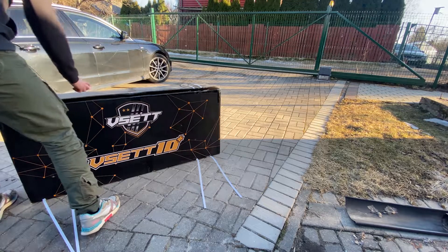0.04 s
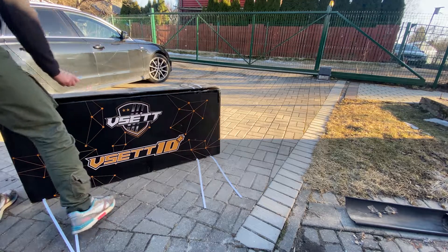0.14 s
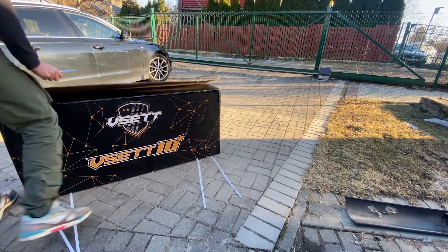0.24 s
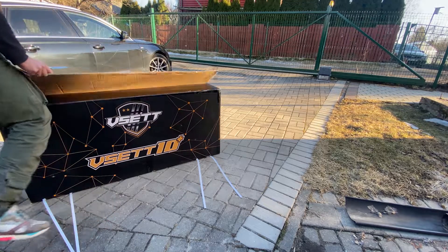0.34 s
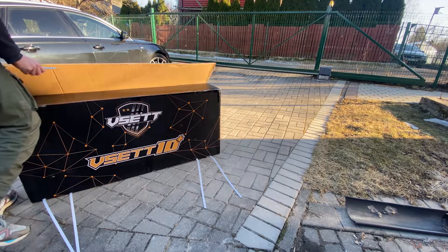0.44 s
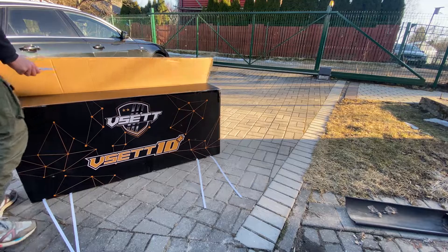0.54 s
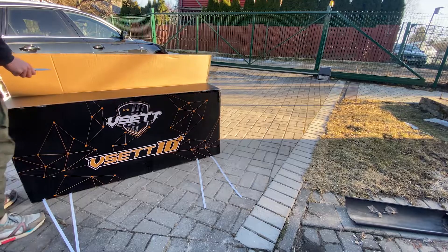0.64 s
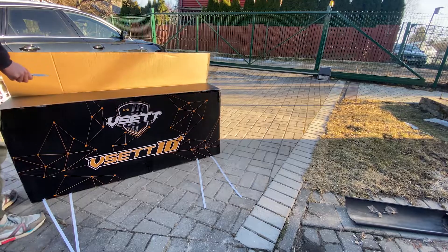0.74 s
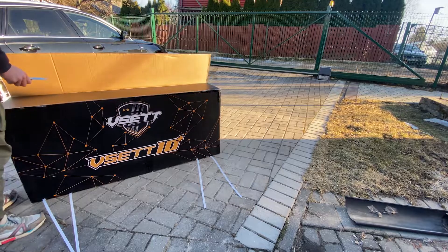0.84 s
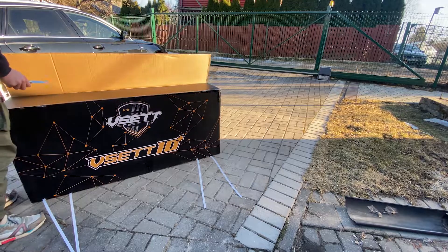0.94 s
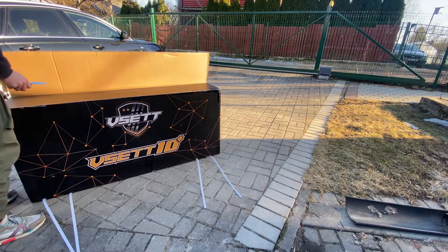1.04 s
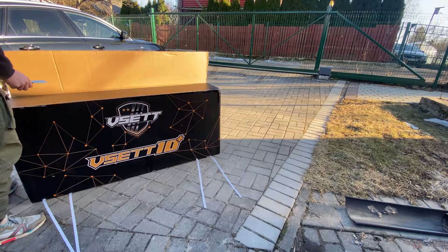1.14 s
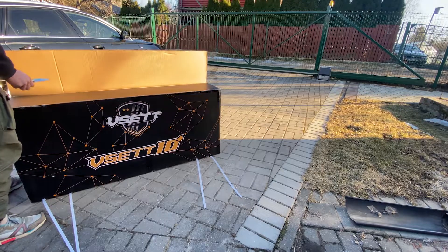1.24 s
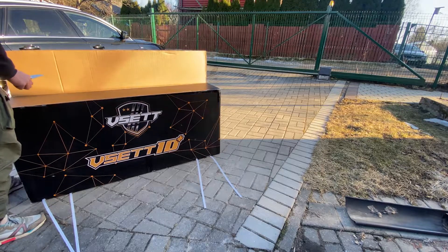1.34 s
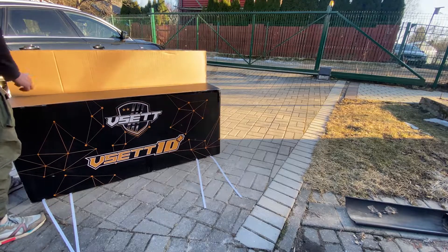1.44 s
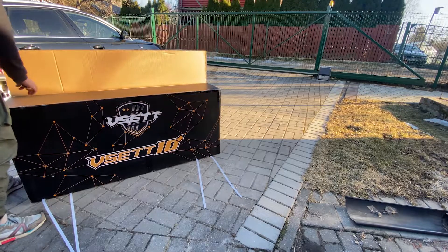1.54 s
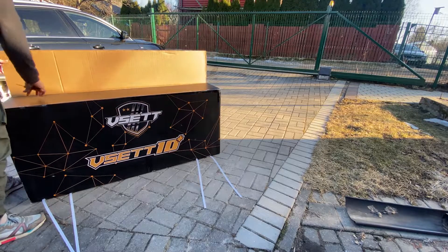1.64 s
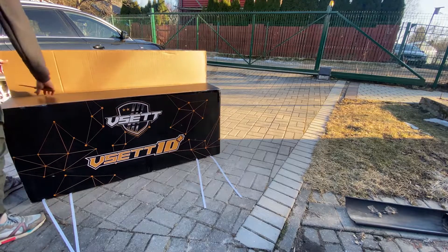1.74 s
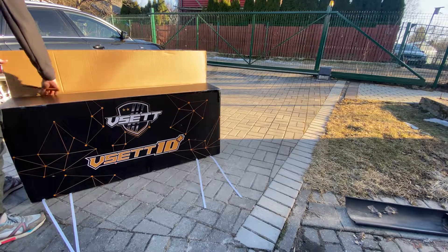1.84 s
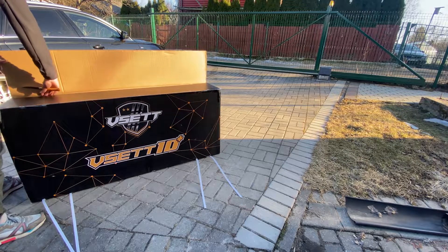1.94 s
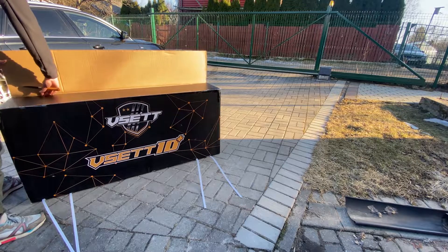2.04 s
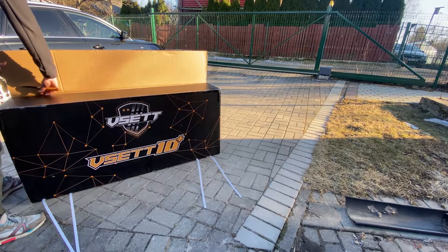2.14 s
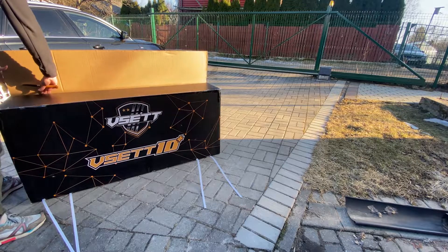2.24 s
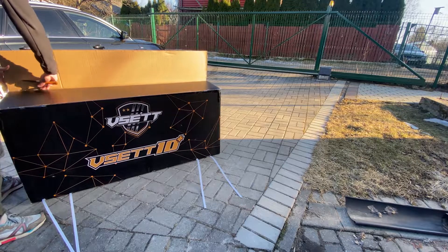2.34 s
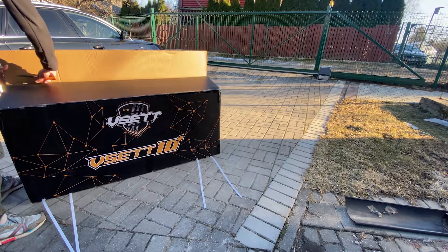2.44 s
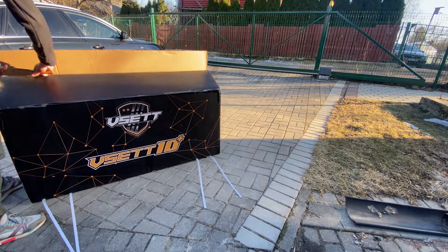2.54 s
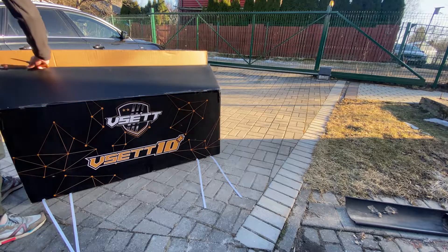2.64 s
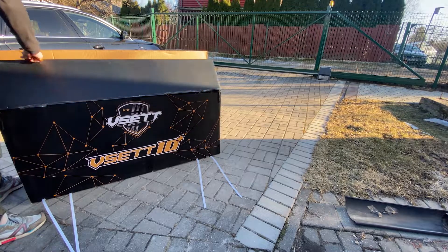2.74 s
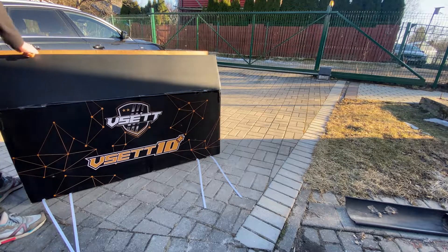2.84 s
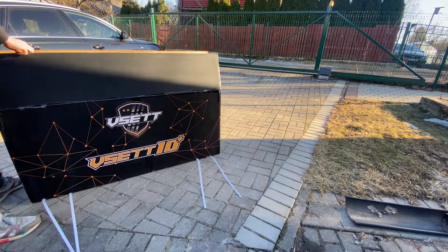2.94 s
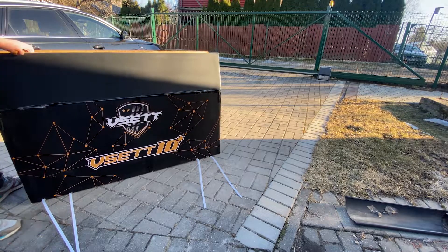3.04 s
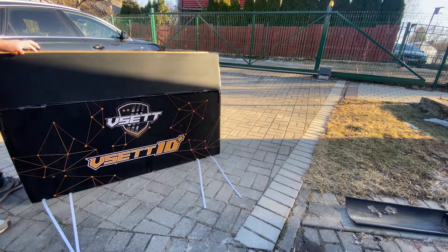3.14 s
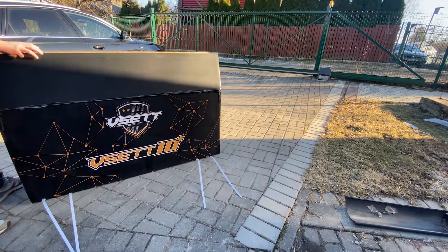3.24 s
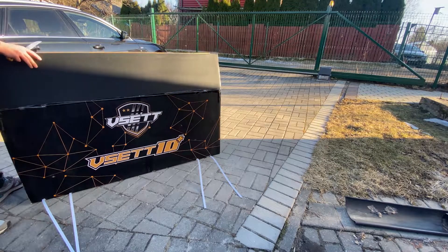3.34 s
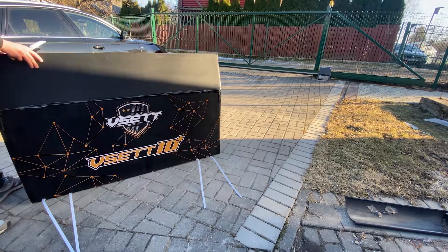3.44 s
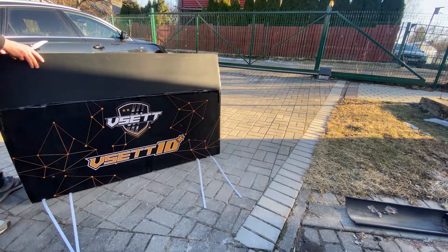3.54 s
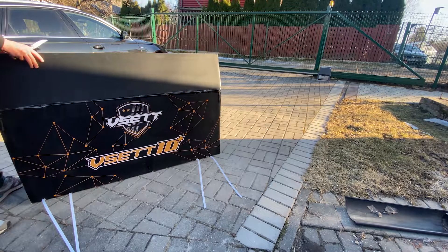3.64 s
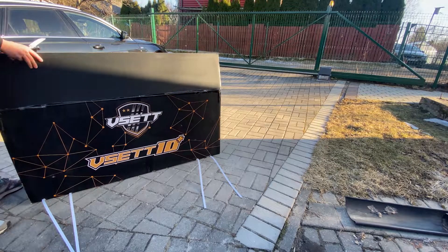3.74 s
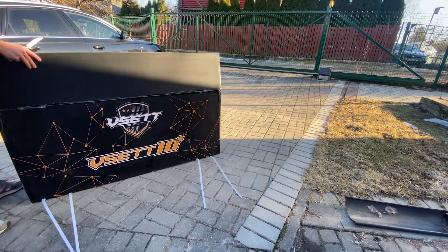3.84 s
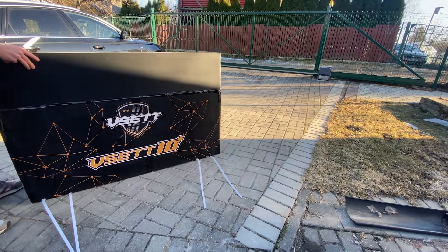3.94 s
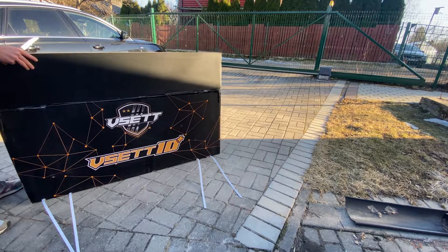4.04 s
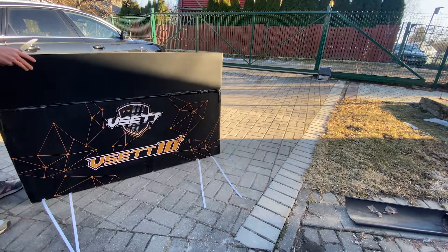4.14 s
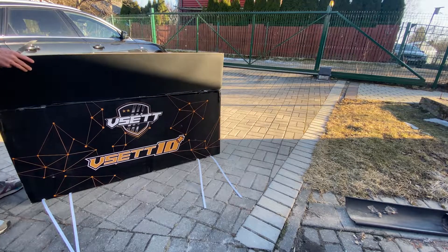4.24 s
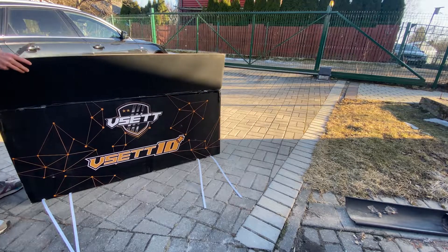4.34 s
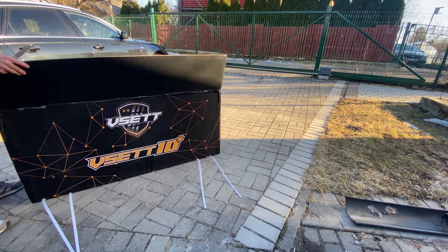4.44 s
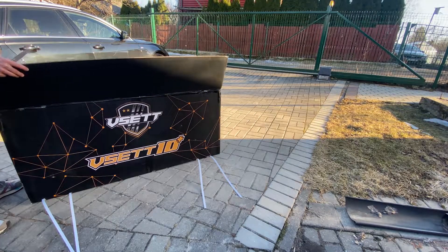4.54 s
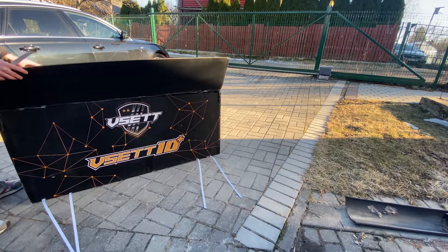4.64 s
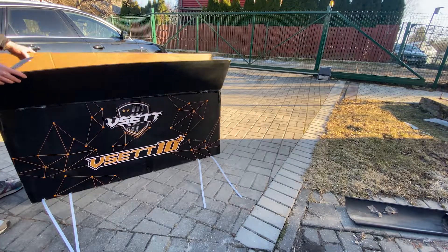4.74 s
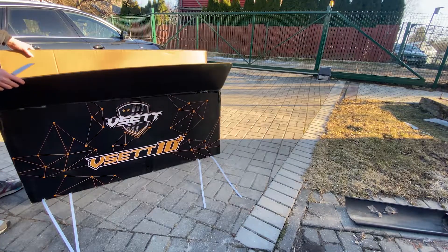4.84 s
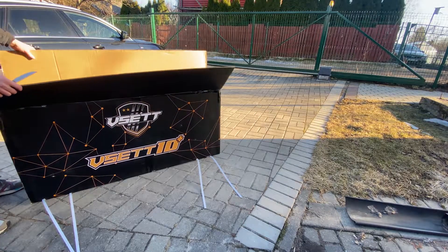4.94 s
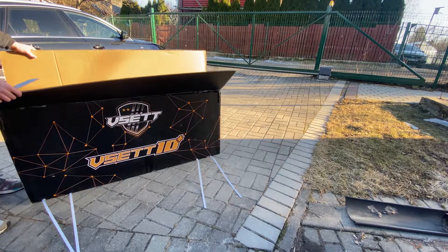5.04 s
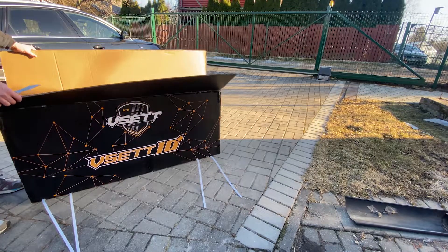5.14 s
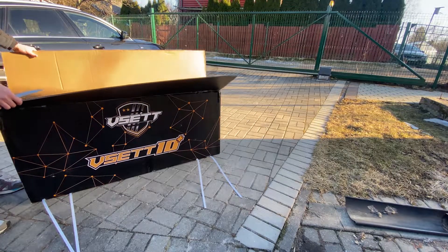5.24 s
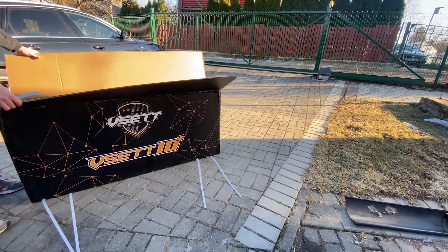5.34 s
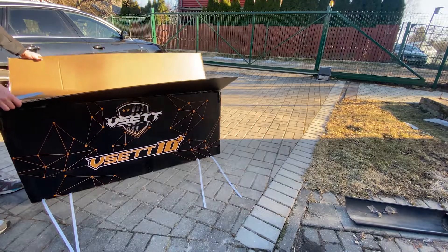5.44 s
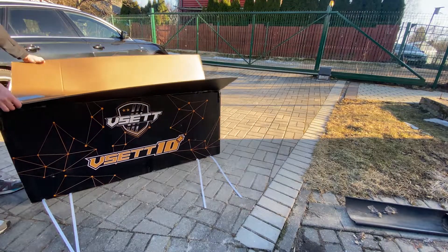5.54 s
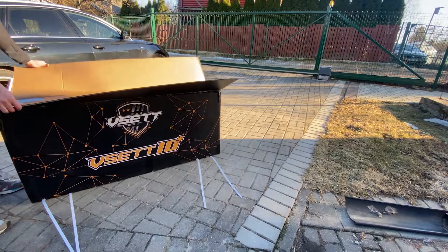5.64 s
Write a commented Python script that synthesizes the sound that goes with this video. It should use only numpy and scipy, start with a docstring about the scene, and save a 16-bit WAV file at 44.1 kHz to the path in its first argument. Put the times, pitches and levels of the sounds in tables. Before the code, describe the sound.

Dry cardboard handling on a quiet driveway: soft sliding, flap scrapes, crease cracks, brief rising squeaky buzzes, then a deep boxy thud and crunchy slap.

```python
"""A big corrugated carton is opened on a paved driveway, a little to the left of the microphone.
From the start hands and sleeves slide over the board, a friction of many random slips in a quiet street.
Bumps soon send dispersive bending waves through the walls, flaps scrape on each other by stick and slip,
and creases snap as impulses through a resonance; past the middle, pressed edges buzz at a rising pitch.
Near the end the front flap swings over and thumps down, closer to straight ahead."""
import sys
import numpy as np
from scipy import signal
from scipy.fft import rfft, irfft, next_fast_len
from scipy.io import wavfile

SR = 44100
rng = np.random.default_rng(int(sys.argv[2]) if len(sys.argv) > 2 else 0)


def inscribe(sig):
    """Save sig as 16-bit PCM at rate SR to the path in sys.argv[1].

    A 1-D sig is mono; a 2-D sig holds one channel per row.
    Samples are clipped to [-1, 1] before scaling.
    """
    pcm = np.round(np.clip(np.atleast_2d(sig).T, -1, 1) * 32767)
    wavfile.write(sys.argv[1], SR, pcm.astype(np.int16))


N = 251370
T = np.arange(N) / SR
AGE = T[:SR // 3]   # seconds since a contact

# All dB are relative levels ahead of the echoes, the ports and the microphone.
# Hands and sleeves sliding over board. Each row: start in seconds, rise in seconds, hold in seconds,
# cloth swish in dB, fine skin hiss in dB, flap sway in dB.
SLIDES = [(0, 0.0012, 0.37, -65.5, -72, -57.5), (0.42, 0.027, 0.34, -75.5, -70, -66.5),
          (0.91, 0.023, 0.49, -70, -78, -62.5), (1.69, 0.16, 0.21, -65.5, -62, -57.5),
          (2.14, 0.038, 0.27, -68, -65.5, -65.5), (2.45, 0.03, 0.056, -74.5, -59.5, -72),
          (2.66, 0.019, 0.58, -93, -71.5, -74), (3.28, 0.085, 0.055, -71, -81.5, -54),
          (3.62, 0.26, 0.58, -65.5, -71, -59), (4.42, 0.031, 0.4, -76, -73, -68.5),
          (4.6, 0.32, 0.22, -62.5, -65.5, -53), (5.18, 0.11, 0.11, -57.5, -88, -52),
          (5.44, 0.039, 0.3, -92, -72, -85)]
# Pressed cut edges. Each row: start in seconds, length in seconds, level in dB, starting pitch in Hz.
BUZZES = [(3.089, 0.03, -47, 1700), (3.129, 0.032, -49.5, 2450), (3.741, 0.066, -47, 2060),
          (4.073, 0.0038, -55, 2850), (4.899, 0.016, -59.5, 2620)]
# Strokes of board on board. Each row: start in seconds, rise in seconds, hold in seconds,
# rasp in dB, wall sound in dB.
STROKES = [(0.101, 0.0088, 0.032, -61, -94), (0.645, 0.0091, 0.012, -44, -54),
           (0.927, 0.0012, 0.0026, -46.5, -80), (0.962, 0.061, 0.055, -56, -61),
           (1.099, 0.0047, 0.064, -62, -62.5), (1.304, 0.018, 0.0094, -62, -62),
           (2.134, 0.0079, 0.14, -63.5, -60.5), (2.917, 0.02, 0.021, -51, -85),
           (2.998, 0.0022, 0.023, -50.5, -63), (3.081, 0.008, 0.05, -53, -49.5),
           (3.126, 0.012, 0.023, -42.5, -45), (3.382, 0.029, 0.028, -70.5, -59.5),
           (3.679, 0.094, 0.043, -45, -52.5), (4.074, 0.0082, 0.0021, -53.5, -60),
           (4.821, 0.1, 0.041, -58.5, -67), (5.342, 0.019, 0.0072, -43.5, -53),
           (5.434, 0.0065, 0.003, -51, -64)]
# Creases and tape snapping. Each row: start in seconds, crack peak in dB, pitch in Hz,
# time in seconds for the crackle envelope to fall to exp(-2).
SNAPS = [(0.513, -37.5, 11500, 0.025), (0.603, -48, 4020, 0.024), (0.668, -30, 3870, 0.0046),
         (0.885, -45, 3780, 0.039), (1.111, -34.5, 3270, 0.0045), (1.484, -28, 6300, 0.0094),
         (1.994, -42, 6450, 0.0068), (2.078, -30.5, 6900, 0.01), (2.1, -27.5, 6760, 0.013),
         (2.1276, -9.5, 3120, 0.0053), (2.675, -41, 10200, 0.01), (2.707, -38, 10000, 0.0075),
         (2.792, -39.5, 10400, .008), (2.857, -29.5, 7100, 0.016), (2.903, -22.5, 10500, 0.016),
         (2.961, -30, 5940, 0.0063), (3.964, -30.5, 7330, 0.0066), (4.258, -36.5, 6060, 0.019),
         (4.323, -31.5, 10700, 0.0094), (4.396, -33.5, 12300, 0.014)]
# Bumps on the walls. Each row: start in seconds, boom peak in dB, boom pitch in Hz, board peak in dB,
# board pitch in Hz, crunch in dB before a common lift.
BUMPS = [(0.071, -48.5, 156, -61, 270, -56), (0.152, -42, 80.4, -55.5, 215, -40.5),
         (0.297, -64, 131, -32, 583, -32), (0.313, -45, 145, -37.5, 980, -41),
         (0.332, -64, 135, -35, 1060, -33.5), (0.335, -41.5, 147, -27.5, 475, -41),
         (0.676, -47.5, 84.5, -48, 480, -64), (0.932, -47.5, 158, -40.5, 860, -52),
         (1.046, -52.5, 153, -45, 430, -42), (1.736, -73, 89, -51.5, 570, -52.5),
         (1.865, -59, 194, -41, 523, -44), (1.88, -35, 182, -42, 520, -50),
         (1.895, -39, 129, -42, 390, -56), (1.923, -41.5, 122, -35, 525, -44.5),
         (2.127, -58, 151, -39.5, 585, -23.5), (3.002, -42.5, 61.4, -35.5, 880, -62),
         (3.185, -44, 64, -40, 315, -38.5), (3.545, -57.5, 71.4, -50.5, 505, -51.5),
         (4.201, -41, 69.4, -62, 298, -69.5), (4.234, -42, 99, -37.5, 458, -74),
         (4.313, -43.5, 68, -43.5, 520, -68), (4.334, -55, 128, -38.5, 544, -40.5),
         (4.948, -17.5, 73.5, -31, 433, -44), (4.968, -26, 115, -37.5, 310, -52),
         (5.082, -34.5, 124, -45.5, 315, -71), (5.132, -42, 69.5, -45, 475, -45),
         (5.236, -59, 119, -40, 610, -30.5), (5.263, -43, 112, -25.5, 670, -26),
         (5.321, -31.5, 75.6, -22.5, 637, -18.5), (5.325, -33.5, 170, -30.5, 335, -19.5)]

# Air modes of the carton, then wall modes. Each row: mean pitch in Hz, mean strength in dB,
# time to die by 60 dB in seconds.
AIR_MODES = [(61.1, 12.5, 0.34), (163.2, 10.5, 0.27)]
WALL_MODES = [(233.5, 0, 0.064), (343, 2, 0.16), (483.5, -1, 0.07), (601.5, 12, 0.069), (738, 11.5, 0.039),
              (907, 7, 0.045)]

# Spectra of friction, crushing, wall, loose flaps and street. Each row: frequency in Hz, density in dB.
RASP_SPECTRUM = [(300, -9), (900, 2), (1400, -5), (2200, -3.5), (3500, -10), (4700, -3.5), (7200, -14),
                 (16000, -20.5)]
CRUNCH_SPECTRUM = [(300, -31), (1100, -1), (4800, 1), (7000, -1), (9500, -8.5), (11000, -7), (13500, -44.5)]
SWISH_SPECTRUM = [(300, -19), (900, 10), (1800, -1.5), (3800, -2.5), (6500, -3), (14000, -25.5)]
HISS_SPECTRUM = [(2500, -21), (6200, -9), (8500, -14.5), (10400, -6), (12600, -14)]
WALL_SPECTRUM = [(55, -26.5), (100, -13), (200, -5.5), (520, -0.5), (1000, -1), (1400, -22), (2500, -28.5)]
SWAY_SPECTRUM = [(30, -18), (62, 10), (100, 4.5), (160, -1.5), (230, -5.5), (500, -57.5)]
STREET_SPECTRUM = [(55, 7), (200, -7.5), (600, -12.5), (1500, -17.5), (5000, -27.5), (11000, -31.5)]

# Differences between the two microphone ports. Each row: frequency in Hz,
# phase lead of the left in radians, left minus right level in dB.
PORTS = [(130, -.3, -2.6), (300, .8, .3), (780, 2.2, 1), (1500, 3.3, 1.5), (3200, 6.1, 4.5), (4700, 8.6, 6),
         (5800, 11.7, 5), (8800, 18, 0), (11500, 18.9, -.6)]
# Reflections from surfaces nearby. Each row: delay in seconds, level in dB.
ECHOES = [(.0075, -8.5), (.019, -16.5)]
# Microphone response. Each row: frequency in Hz, gain in dB.
MICROPHONE = [(20, -34), (54, 0), (5000, 2.5), (6500, 2), (7800, 3), (11800, 3.5), (13300, -11.5)]

STREET_DB = -67.5
SLIDE_RELEASE_S, SWAY_RELEASE_S = 0.12, 0.38   # to die by 60 dB; the flaps sway on after the hand stops
STROKE_RELEASE_S = 0.12   # to die by 60 dB
BUZZ_RISE_HZ_PER_S = 19000   # the pitch climbs as the free edge shortens
BUZZ_POLE_WIDTH_HZ = 1350
LANDING_S = 5.22   # the flap lands at the far end of the carton
LANDING_BEARING = 0.695   # share of the usual difference between the ports
CUTOFF_HZ = 16300


def from_db(db):
    """Level: decibels to amplitude gain."""
    return 10 ** (np.asarray(db) / 20)


def rms_one(x):
    """Normalization to unit power."""
    return x / np.sqrt(np.mean(x ** 2) + 1e-20)


def peak_one(x):
    """Normalization to unit height."""
    return x / (np.abs(x).max() + 1e-20)


def at_hz(points, hz, column=1):
    """Interpolation of one table column on a log-frequency axis."""
    points = np.array(points)
    return np.interp(np.log(hz + 1), np.log(points[:, 0]), points[:, column])


def add(track, s, sound):
    """Superposition: mix a sound in at a time in seconds."""
    start = max(round(s * SR), 0)
    track[start:start + len(sound)] += sound[:N - start]


def colour(x, spectrum, size=4096):
    """Minimum-phase filtering: folding the cepstrum gives a causal response with the given spectrum."""
    log_gain = np.log(from_db(at_hz(spectrum, np.fft.rfftfreq(size, 1 / SR))))
    cepstrum = irfft(log_gain)
    cepstrum[1:size // 2] *= 2
    cepstrum[size // 2 + 1:] = 0
    response = irfft(np.exp(rfft(cepstrum)))
    return signal.fftconvolve(x, response)[:len(x)]


def flutter(per_s, depth_db, size=N):
    """Random modulation: a gain of unit power, bounded in dB, with per_s new targets a second."""
    knots = rng.uniform(-2, 2, N // 20)
    wander = np.interp(T[:size] * per_s, np.arange(len(knots)), knots)
    return rms_one(from_db(depth_db * wander))


def fade(t60):
    """Exponential damping by 60 dB in t60 seconds after a contact."""
    return from_db(-60 * AGE / t60)


def ring(modes, spread_db):
    """Modal superposition: decaying sines whose strength and pitch differ with the place of the blow."""
    total = np.zeros(len(AGE))
    for hz, db, t60 in modes:
        strength = from_db(db + spread_db * rng.standard_normal())
        pitch = hz * (1 + .05 * rng.standard_normal())
        total += strength * fade(t60) * np.sin(2 * np.pi * pitch * AGE)
    return total


def swing(hz, cycles):
    """Damped oscillation: a panel swings up over a cycle or so and dies away."""
    turns = AGE * hz
    return peak_one(turns * np.exp(-turns / cycles) * np.sin(2 * np.pi * turns))


def bend(x, travel_s):
    """Dispersion: bending waves travel as the root of frequency, so highs lead; travel_s is for 100 Hz."""
    size = 2 * len(x)
    hz = np.fft.rfftfreq(size, 1 / SR)
    dispersion = np.exp(-4j * np.pi * travel_s * 10 * np.sqrt(hz))
    return irfft(rfft(x, size) * dispersion)[:len(x)]


def slips(per_s, spread_db, size=N):
    """Stick and slip: fibres catch and let go in random clicks of uneven size and either sign."""
    excess = np.minimum(rng.exponential(1, size), 4)
    sizes = from_db(spread_db * excess) * rng.choice([-1, 1], size)
    return sizes * (rng.random(size) < per_s / SR)


def judder():
    """Irregular stick and slip: an edge runs over the flutes, its slips bunched into short catches."""
    size = len(AGE)
    clicks = slips(per_s=6500, spread_db=2.2, size=size)
    return clicks * flutter(380, 3.0, size) * flutter(120, 1.4, size)


def gesture(s, rise_s, hold_s, release_s):
    """Kinematics: a movement gathers speed smoothly, keeps it, then dies away exponentially."""
    speed = np.sin(np.pi / 2 * np.clip((T - s) / rise_s, 0, 1)) ** 2
    return speed * np.exp(-np.log(1000) * np.maximum(T - s - rise_s - hold_s, 0) / release_s)


def rubbing(moves, release_s):
    """Power addition: one gain in time for each dB column, summing overlapping movements as powers."""
    power = 0
    for s, rise_s, hold_s, *dbs in moves:
        power = power + np.outer(from_db(dbs), gesture(s, rise_s, hold_s, release_s)) ** 2
    return np.sqrt(power)


def glance(x, share=0.32, lag_s=0.000818):
    """Comb interference: board beside a contact mirrors its sound across a changing gap. Unit power."""
    t = T[:len(x)]
    lag = lag_s * flutter(4, 1.1, len(x))
    return rms_one(x + share * np.interp(t - lag, t, x))


def wall_sound(force, ring_db):
    """Forced vibration: friction heard through the carton wall and its modes. Unit power."""
    through = rms_one(signal.fftconvolve(force, ring(WALL_MODES, spread_db=10.0))[:len(force)])
    return rms_one(rms_one(colour(force, WALL_SPECTRUM)) + from_db(ring_db) * through)


def street():
    """Diffuse background: one steady coloured noise of the quiet street."""
    return from_db(STREET_DB) * rms_one(colour(rng.standard_normal(N), STREET_SPECTRUM))


def sliding():
    """Dry friction: skin and cloth slip finely and catch as the grip changes; loose flaps sway beneath."""
    swish, hiss, _ = rubbing(SLIDES, SLIDE_RELEASE_S)
    *_, sway = rubbing(SLIDES, SWAY_RELEASE_S)
    force = rms_one(slips(per_s=7000, spread_db=3.0) * flutter(per_s=57, depth_db=1.5))
    catches = .7 * rms_one(slips(per_s=70, spread_db=2.5))
    cloth = swish * glance(colour(force + catches, SWISH_SPECTRUM))
    skin = hiss * glance(colour(force + .5 * catches, HISS_SPECTRUM)) * flutter(per_s=29, depth_db=3.3)
    rumble = rms_one(colour(rng.standard_normal(N), SWAY_SPECTRUM))
    murmur = wall_sound(force + 2 * catches, ring_db=-8.5) * flutter(per_s=25, depth_db=3.0)
    flaps = from_db(-4.5) * rumble + from_db(-6.5) * murmur
    return cloth + skin + sway * flaps


def buzzes():
    """Driven resonance: judder excites a broad resonance of the cut edge, gliding up during the stroke."""
    out = np.zeros(N)
    r = np.exp(-np.pi * BUZZ_POLE_WIDTH_HZ / SR)
    for s, length_s, db, hz in BUZZES:
        pitch = hz + BUZZ_RISE_HZ_PER_S * np.minimum(AGE, length_s)
        turn = np.exp(2j * np.pi * np.cumsum(pitch) / SR)
        # shift the pitch down to zero, resonate there, and shift back
        edge = np.real(turn * signal.lfilter([1], [1, -2 * r, r * r], judder() / turn))
        pressure = gesture(0, .008, length_s, STROKE_RELEASE_S)[:len(AGE)]
        add(out, s, from_db(db) * pressure * rms_one(edge))
    return out


def scrapes():
    """Stick and slip: each stroke rasps and shakes the wall, which rings differently from place to place."""
    out = np.zeros(N)
    for s, rise_s, hold_s, rasp_db, wall_db in STROKES:
        force = judder()
        speed = gesture(0, rise_s, hold_s, STROKE_RELEASE_S)[:len(AGE)]
        rasp = from_db(rasp_db) * glance(colour(force, RASP_SPECTRUM))
        wall = from_db(wall_db) * wall_sound(force, ring_db=-11.5)
        add(out, s, speed * (rasp + wall))
    return out


def snaps(q=0.84, edge_db=-5, body_db=-36):
    """Impulsive release: a crease cracks, smaller fibres follow, and the wall answers faintly."""
    out = np.zeros(N)
    for s, db, hz, lasts in SNAPS:
        force = from_db(-27) * rng.laplace(size=len(AGE)) * np.exp(-2 * AGE / lasts)
        force[0] = 1   # the crack itself
        band = signal.iirpeak(min(hz, SR / 3), q, fs=SR)
        crack = signal.lfilter(*band, signal.lfilter(*band, force + 1e-18))
        edge = from_db(edge_db) * peak_one(np.diff(force, prepend=0))
        body = from_db(body_db) * peak_one(ring(WALL_MODES, spread_db=3.0))
        add(out, s, from_db(db) * (peak_one(peak_one(crack) + edge) + body))
    return out


def bumps(boom_cycles=0.62, board_cycles=0.81, boom_travel_s=0.0092, board_travel_s=0.01016,
          air_db=-19, wall_db=-21, knock_db=-5, knock_hz=1000, scatter_db=-21,
          crackles_per_s=2500, crunch_t60=0.027, crunch_rise_s=0.00092):
    """Dispersive impact: a bump crushes fibres, chirps down through the board and rocks the carton."""
    out = np.zeros(N)
    for s, boom_db, boom_hz, board_db, board_hz, crunch_db in BUMPS:
        air = ring(AIR_MODES, spread_db=1.0)
        wall = ring(WALL_MODES, spread_db=3.0)
        boom = bend(swing(boom_hz, boom_cycles) + from_db(air_db) * air, boom_travel_s)
        # waves thrown back from folds and edges blur into a short boxy tail
        scatter = rms_one(colour(rng.standard_normal(len(AGE)), WALL_SPECTRUM)) * fade(0.19)
        # the stiff facing answers first, with a short, broad knock
        panel = swing(board_hz, board_cycles) + from_db(knock_db) * swing(knock_hz, 0.29)
        board = bend(panel + from_db(wall_db) * wall + from_db(scatter_db) * scatter, board_travel_s)
        fibres = slips(crackles_per_s, spread_db=1.5, size=len(AGE))
        envelope = fade(crunch_t60) * (1 - np.exp(-AGE / crunch_rise_s))
        crush = colour(fibres * envelope, CRUNCH_SPECTRUM)
        crunch = from_db(crunch_db + 11.5) * crush / np.linalg.norm(crush)   # set by total energy
        add(out, s, from_db(boom_db) * peak_one(boom) + from_db(board_db) * peak_one(board) + crunch)
    return out


def ports(x, bearing=1):
    """Interaural-like differences: phase and level between the ports vary with frequency and bearing."""
    size = next_fast_len(N + SR // 10)
    hz = np.fft.rfftfreq(size, 1 / SR)
    lead = np.exp(.5j * bearing * at_hz(PORTS, hz))
    gain = from_db(bearing * at_hz(PORTS, hz, column=2) / 2)
    half = lead * gain   # each port takes half of the difference
    return irfft(rfft(x, size) * np.array([half, 1 / half]), size)[:, :N]


def yard(x, scatter_db=-14, t60=0.33, blur_t60=0.013):
    """Rough reflection: blurred near echoes and a thin scatter from fence and house, unlike at each port."""
    sides = []
    highpass = signal.butter(1, 400, "high", fs=SR)
    for _ in range(2):
        tail = rng.standard_normal(len(AGE)) * fade(t60)
        scatter = colour(tail, [(60, 1.0), (400, 4.0), (12000, -3.5)])   # Hz, dB
        response = from_db(scatter_db) * scatter / np.linalg.norm(scatter)
        for delay, db in ECHOES:
            blur = signal.lfilter(*highpass, rng.standard_normal(len(AGE)) * fade(blur_t60))
            response += from_db(db) * np.roll(blur / np.linalg.norm(blur), round(delay * SR))
        sides.append(signal.fftconvolve(x, response)[:N])
    return np.array(sides)


def scene():
    """Superposition of the street, the carton at its two bearings and its echoes."""
    carton = sliding() + buzzes() + scrapes() + snaps() + bumps()
    far = carton * np.clip((T - LANDING_S) / .01, 0, 1)   # all carton sound from the landing on
    direct = ports(carton - far + street()) + ports(far, LANDING_BEARING)
    each_side = .5 * np.array([street(), street()])   # street noise unlike at each port
    return direct + yard(carton) + each_side


def record(dry):
    """Band limiting: the microphone sheds deep bass and high treble, and the top is cut steeply."""
    heard = np.array([colour(side, MICROPHONE) for side in dry])
    steep_cut = signal.ellip(10, .1, 80, CUTOFF_HZ, fs=SR, output="sos")   # ripple, then stopband in dB
    return signal.sosfilt(steep_cut, heard)


dry = scene()
out = record(dry)
inscribe(out)
```